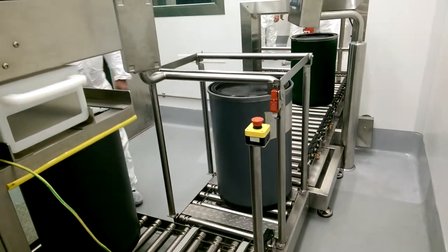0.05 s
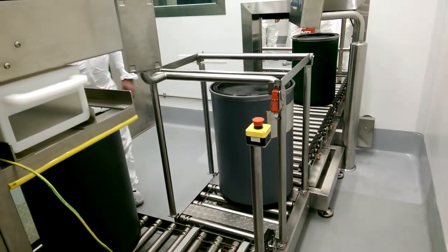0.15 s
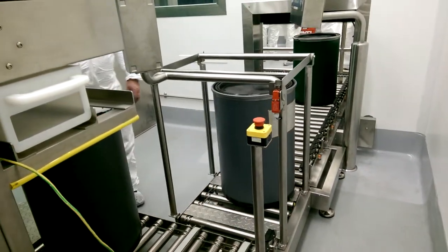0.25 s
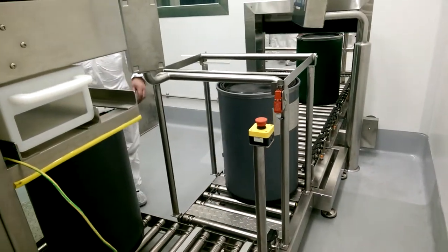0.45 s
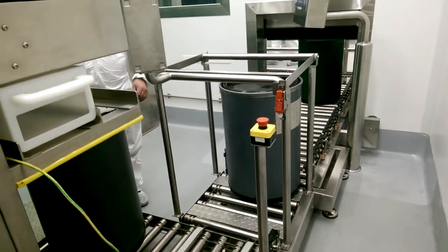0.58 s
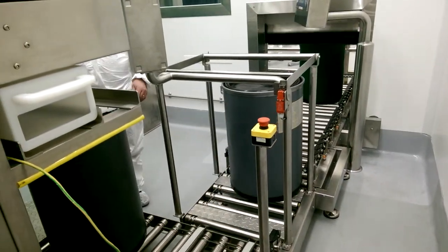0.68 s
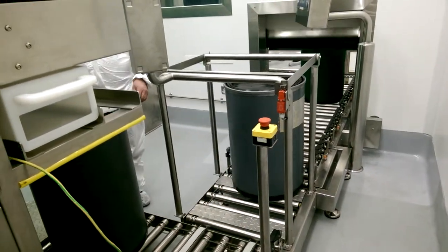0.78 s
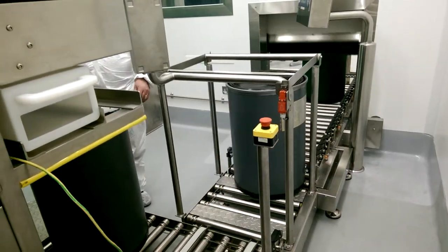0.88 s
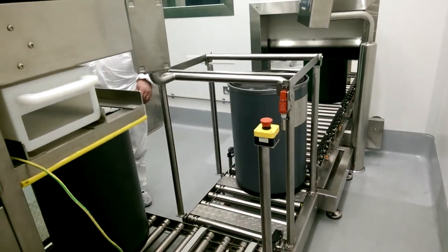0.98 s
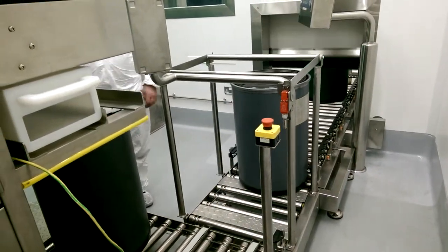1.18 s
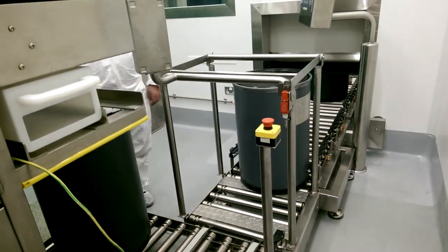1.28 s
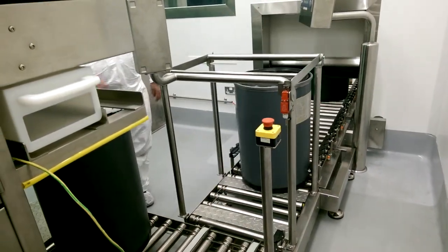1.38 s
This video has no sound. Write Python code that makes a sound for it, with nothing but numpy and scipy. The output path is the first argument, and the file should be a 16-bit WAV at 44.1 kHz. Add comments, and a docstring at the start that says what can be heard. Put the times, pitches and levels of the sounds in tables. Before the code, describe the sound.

A metal shutter lands with a heavy, ringing clunk over a rumbling, whining conveyor.

```python
"""Conveyor and shutter in a clean room

A stereo microphone stands in a hard-walled room, far enough off for the walls to blur every tone.
A roller conveyor carries drums: motors rumble and hum, rollers hiss, inverters whine near 4 kHz.
A catch clinks and valves spit air; a shutter slides, lands with a heavy clunk and rebounds.
Its steel panels and the room ring on, with one light tick from the mechanism."""
import sys
import numpy as np
from scipy import signal
from scipy.fft import rfft, irfft
from scipy.io import wavfile

SR = 44100
rng = np.random.default_rng(int(sys.argv[2]) if len(sys.argv) > 2 else 0)


def bounce(signal):
    """Save signal as a 16-bit WAV file at the path given by the first command-line argument."""
    frames = np.transpose(np.atleast_2d(signal))
    limited = np.clip(frames, -1, 1)
    pcm = np.round(limited * 32767).astype(np.int16)
    wavfile.write(sys.argv[1], SR, pcm)


N = 63945
T = np.arange(N) / SR
HZ = np.maximum(np.arange(N // 2 + 1) * SR / N, 1)
SIDES = np.array([[1], [-1]])  # left, right

# the room at the microphone: (frequency [Hz], left-right correlation [-1 to 1])
CORRELATION = [(60, 0.97), (120, 1), (230, 0.92), (410, 0.76), (770, 0.55), (1400, -0.22), (2800, 0.16),
               (6000, 0.014)]
# the stereo image: (frequency [Hz], left minus right [dB])
BALANCE = [(100, 0), (170, 0.5), (270, -3.5), (440, 1.3), (720, 1), (1200, -2), (2000, -3), (3200, -3),
           (5200, -9.5), (8000, -5), (12000, -1.5)]
# colours of the noises at the microphone: (frequency [Hz], relative density [dB])
RUMBLE_SPECTRUM = [(20, -15), (34, -20), (55, -2.5), (86, -5.5), (130, -1), (190, -5.5), (230, -9.5),
                   (320, -10), (410, -8.5), (480, -11), (540, -10), (650, -16.5), (820, -14), (1400, -20.5),
                   (3000, -30), (15500, -65)]
HISS_SPECTRUM = [(300, -17), (1000, -9.5), (1550, -3), (2030, 1), (2350, -4), (3200, -3), (3900, 0.5),
                 (4600, -5.5), (5600, -16.5), (7000, -25.5), (8000, -28.5), (9000, -30), (12000, -33),
                 (15500, -37)]
TICK_SPECTRUM = [(3000, -8), (8000, 3), (11000, 2), (14000, 0), (15500, 1)]
AIR_SPECTRUM = [(1000, -26), (3000, -11), (5200, 1), (6300, -6.5), (9000, -15), (12000, -23), (15500, -26)]
SLIDE_SPECTRUM = [(30, 3.5), (100, 9.5), (200, 2.5), (500, -4), (1000, 2.5), (1700, -3), (2700, -5.5),
                  (3700, -2), (4800, -8.5), (6000, -23.5), (8000, -34), (11000, -64), (15500, -59)]
CLATTER_SPECTRUM = [(30, -20), (100, -2.5), (280, 7.5), (480, -8.5), (1000, -1.5), (2000, -1), (3600, -6),
                    (4700, -13.5), (6000, -19.5), (8000, -28.5), (11000, -42), (15500, -54)]
# rise and fall of motors, rollers and sliding shutter: (time [s], level [dB])
RUMBLE_LEVEL = [(0, -41), (.06, -41.5), (.16, -44), (.6, -38.5), (.9, -43), (1.04, -42), (1.18, -42),
                (1.27, -43.5), (1.37, -42.5), (1.45, -43)]
HISS_LEVEL = [(0, -38.5), (.7, -47.5), (.95, -48.5), (1.1, -46), (1.45, -47)]
SLIDE_LEVEL = [(0, -43), (.1, -38.5), (.18, -36), (.24, -37), (.3, -30), (.5, -46), (.8, -60)]
# the motors' tones: (frequency [Hz], level [dB])
HUM_TONES = [(86, -52), (120, -52), (221, -59.5), (426, -59)]
# the inverters' switching tones: (frequency [Hz])
WHINE_HZ = [2008, 3523, 3650, 3747, 3840, 3887.5, 3936, 3977, 4022.5, 4129, 8000]
# each tone before and after the next drive runs up, swell aside: (level [dB])
WHINE_EARLY_DB = [-69, -75, -73, -72, -63, -59, -54.5, -64, -51.5, -69, -82]
WHINE_LATE_DB = [-62, -77, -68, -71, -63, -55.5, -60.5, -53.5, -56, -61, -80.5]
# swell of the whole whine: (time [s], gain [dB])
WHINE_SWELL = [(0, 0), (.12, 3.5), (.25, -0.5), (.8, -1.5), (1.0, -1), (1.2, -3), (1.36, 3), (1.45, 1.5)]
# air from the valves: (time [s], level [dB], t60 [s])
AIR_SPITS = [(.055, -45.5, 0.22), (.664, -54, 0.13)]
# the blow on the catch: (time [s], gain [dB])
CLINKS = [(.057, 4)]
# steel modes of the catch and the shutter panel: (frequency [Hz], level at 0 dB gain [dB], t60 [s])
CATCH_MODES = [(1498, -49, 0.32), (1636, -43.5, 0.56), (2050, -43, 0.36), (3790, -48, 0.48),
               (3940, -41, 0.33), (4640, -47.5, 0.39), (4770, -48, 0.4), (5050, -46, .25)]
PANEL_MODES = [(54.44, -32.5, 0.81), (103.7, -32.5, 0.82), (150, -33.5, 1.27), (188, -42, 1.3),
               (219, -36.5, 1.2), (248, -38, 0.79), (274.1, -34, 0.79), (325, -35, 0.87),
               (520.8, -46.5, 1.0), (591, -50, 1.6), (709.4, -51.5, 1.1), (869, -40.5, 0.95),
               (1115, -49, 0.85), (1289, -48.5, 1.66), (1468, -44.5, 0.76), (2824, -39.5, 0.28),
               (3550, -40, .45), (3700, -40, 0.35), (4200, -43.5, 0.54), (4510, -51, 0.51),
               (5830, -58, 0.27)]
# the hard walls' answer to a knock: (frequency [Hz], relative density [dB], t60 [s])
ROOM_TAIL = [(40, -18, .8), (110, 3.5, 0.96), (270, 10.5, 1.19), (472, -1, 1.33), (900, -3, 1.63),
             (1800, -4.5, 1.24), (3700, -13.5, 1.36), (4960, -25, 0.6), (7000, -27, .6),
             (10000, -41.5, 0.4), (15700, -60, .4)]
# the shutter's steel meets steel: (time [s], ring gain [dB], clatter gain [dB])
KNOCKS = [(0.207, -4, -14.5), (0.27, -17, -20), (0.285, -7, 5), (0.295, 2.5, 0), (.338, -2.5, -17)]
# the panel flexes: (time [s], frequency [Hz], level [dB], length [s])
FLEXES = [(0.201, 131, -32, 0.02), (.286, 133.6, -8, 0.0324), (0.306, 306, -22, .022),
          (.331, 196, -21, .03), (.363, 111, -18.5, 0.036), (.417, 114.2, -23, 0.046),
          (.456, 152.5, -26, 0.042), (.545, 129, -34.5, 0.048)]


def from_db(db):
    """Decibels to gain."""
    return 10 ** (np.asarray(db) / 20)


def unit_power(x):
    """Scale to an rms of 1."""
    return x / np.sqrt(np.mean(x ** 2) + 1e-20)


def in_time(rows):
    """Join (time, value) points by lines."""
    return np.interp(T, *np.transpose(rows))


def at_hz(rows, hz, column=1):
    """Read a column of a table on a log-frequency axis."""
    rows = np.array(rows)
    return np.interp(np.log(hz), np.log(rows[:, 0]), rows[:, column])


def drift(rate_hz):
    """A slow random wander of unit power."""
    return unit_power(irfft(rfft(rng.standard_normal(N)) / (1 + (HZ / rate_hz) ** 2), N))


def stereo(mid, side, hz):
    """The microphone's two channels, alike in the bass and leaning right in the treble."""
    alike = np.clip(at_hz(CORRELATION, hz), -.999, .999)
    pair = np.sqrt(1 + alike) * mid + np.sqrt(1 - alike) * side * SIDES
    return pair * from_db(SIDES * at_hz(BALANCE, hz) / 2)


def noise(spectrum, grain=1):
    """Stereo noise of unit power; grain roughens it before the spectrum colours it."""
    mid, side = rfft(grain * rng.standard_normal((2, N)))
    return unit_power(irfft(stereo(mid, side, HZ) * from_db(at_hz(spectrum, HZ)), N))


def strike(start, attack_s, t60):
    """A quick rise and an exponential decay."""
    age = np.maximum(T - start, 0)
    return (1 - np.exp(-age / attack_s)) * from_db(-60 * age / t60)


def contacts(per_s, size_db):
    """Random tiny impacts of unit power; size_db makes them uneven."""
    hits = rng.random(N) < per_s / SR
    return unit_power(hits * from_db(size_db * np.minimum(rng.exponential(1, N), 3)))


def wavering(hz, depth, rate_hz):
    """A steady tone, made to waver on its way across the room."""
    tone = np.exp(2j * np.pi * (hz * T + rng.random()))
    mid, side = [tone * (1 + depth * (drift(rate_hz) + 1j * drift(rate_hz))) for _ in range(2)]
    return stereo(mid.real, side.imag, hz)


def ringing(modes, blows, attack_s, vary_db, blur_rad):
    """Every blow rings each mode with a strength of its own; the room blurs their phase."""
    out = np.zeros((2, N))
    for hz, db, t60 in modes:
        power = 0
        for start, blow_db, *_ in blows:
            strength = from_db(blow_db + vary_db * rng.standard_normal())
            power += (strength * strike(start, attack_s, t60)) ** 2
        phase = 2 * np.pi * (hz * T + rng.random()) + blur_rad * drift(16)
        out += from_db(db) * np.sqrt(power / 2) * stereo(np.sin(phase), np.cos(phase), hz)
    return out


def knock_envelope(attack_s, t60, bright=1):
    """The knocks' decays, added in power; bright runs from ring gain (0) to clatter gain (1)."""
    power = 0
    for start, ring_db, clatter_db in KNOCKS:
        strength = from_db(ring_db + bright * (clatter_db - ring_db))
        power += (strength * strike(start, attack_s, t60)) ** 2
    return np.sqrt(power)


def conveyor(flutter_db=.5):
    """The bed of the scene: motors rumble under the fine ticking hiss of rollers and chain."""
    rumble = noise(RUMBLE_SPECTRUM) * from_db(in_time(RUMBLE_LEVEL) + flutter_db * drift(47))
    hiss = noise(HISS_SPECTRUM, contacts(per_s=2500, size_db=1) + 1.7)
    return rumble + hiss * from_db(in_time(HISS_LEVEL) + flutter_db * drift(20))


def motor_hum():
    """The low tones of the geared motors."""
    return sum(from_db(db) * wavering(hz, depth=.45, rate_hz=5.9) for hz, db in HUM_TONES)


def inverter_whine(midpoint_s=.73, ramp_s=.44):
    """Switching tones beat together; their balance shifts as the next drive runs up."""
    run_up = np.clip((T - midpoint_s) / ramp_s + .5, 0, 1)
    tones = sum(from_db(early + run_up * (late - early)) * wavering(hz, depth=.31, rate_hz=5.2)
                for hz, early, late in zip(WHINE_HZ, WHINE_EARLY_DB, WHINE_LATE_DB))
    return from_db(in_time(WHINE_SWELL)) * tones


def mechanism_tick():
    """One light, dry tick after the shutter has landed."""
    return from_db(-58) * noise(TICK_SPECTRUM) * strike(start=.668, attack_s=.001, t60=.04)


def valve_air():
    """The valves let out thin spits of air."""
    spits = sum(from_db(db) * strike(start, attack_s=.0023, t60=t60) for start, db, t60 in AIR_SPITS)
    return noise(AIR_SPECTRUM) * spits


def catch_clink():
    """A small steel catch is struck and rings high."""
    return ringing(CATCH_MODES, CLINKS, attack_s=.0039, vary_db=1.5, blur_rad=1)


def room_tail(clatter_from_hz=4000):
    """The knocks come back off the hard walls, each octave dying at its own rate."""
    wash = rfft(noise(ROOM_TAIL))
    out = np.zeros((2, N))
    for hz in 31.25 * 2.0 ** np.arange(10):
        octave = irfft(wash * np.maximum(1 - abs(np.log2(HZ / hz)), 0), N)
        bright = min(hz / clatter_from_hz, 1)
        out += octave * knock_envelope(attack_s=.0074, t60=at_hz(ROOM_TAIL, hz, column=2), bright=bright)
    return from_db(-29) * out


def shutter_slide(judder_db=1):
    """The shutter rubs along its guides."""
    rub = noise(SLIDE_SPECTRUM, contacts(per_s=3000, size_db=0) + .5)
    return rub * from_db(in_time(SLIDE_LEVEL) + judder_db * drift(25))


def shutter_clatter():
    """Loose steel parts chatter for a moment after each knock."""
    chatter = noise(CLATTER_SPECTRUM, contacts(per_s=650, size_db=2.5) + 1.2)
    return from_db(-26) * chatter * knock_envelope(attack_s=.0053, t60=.17)


def panel_ring():
    """The knocks set the shutter's steel panel ringing."""
    return ringing(PANEL_MODES, KNOCKS, attack_s=.0044, vary_db=1, blur_rad=.35)


def panel_thumps():
    """The weight of the clunk, dead centre: each flex swells and dies within a few slow cycles."""
    out = np.zeros(N)
    for start, hz, db, length in FLEXES:
        age = np.clip(T - start, 0, length)
        out -= from_db(db) * np.sin(np.pi * age / length) * np.sin(2 * np.pi * hz * age)
    return out


def scene():
    """The running conveyor behind, the small noises over it, the shutter in front."""
    background = conveyor() + motor_hum() + inverter_whine()
    small_noises = mechanism_tick() + valve_air() + catch_clink()
    shutter = room_tail() + shutter_slide() + shutter_clatter() + panel_ring() + panel_thumps()
    return background + small_noises + shutter


def record(dry, cutoff_hz=15750):
    """The microphone's signal passes a steep low-pass, settled by a mirrored lead-in."""
    lowpass = signal.ellip(10, .1, 80, cutoff_hz, fs=SR, output="sos")
    with_lead_in = np.concatenate([dry[:, ::-1], dry], axis=1)
    return signal.sosfilt(lowpass, with_lead_in)[:, N:]


dry = scene()
out = record(dry)
bounce(out)
```